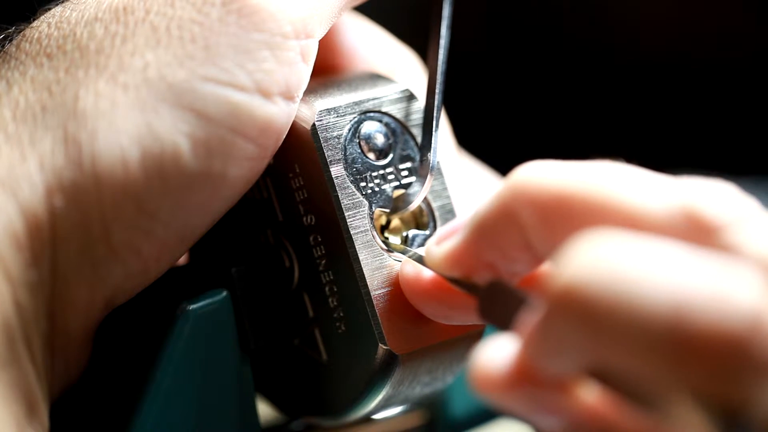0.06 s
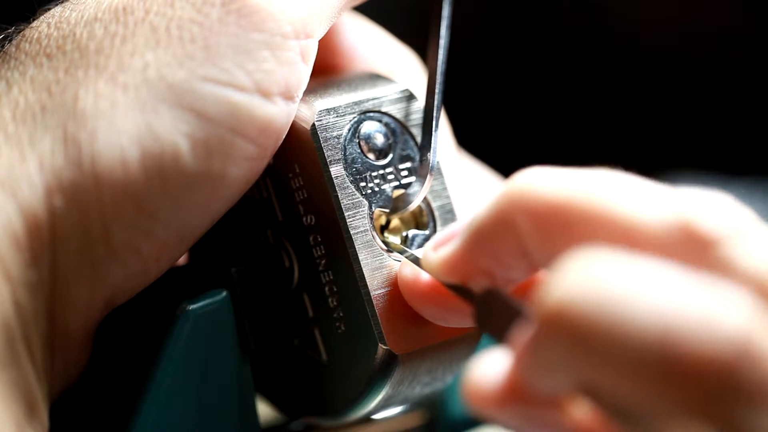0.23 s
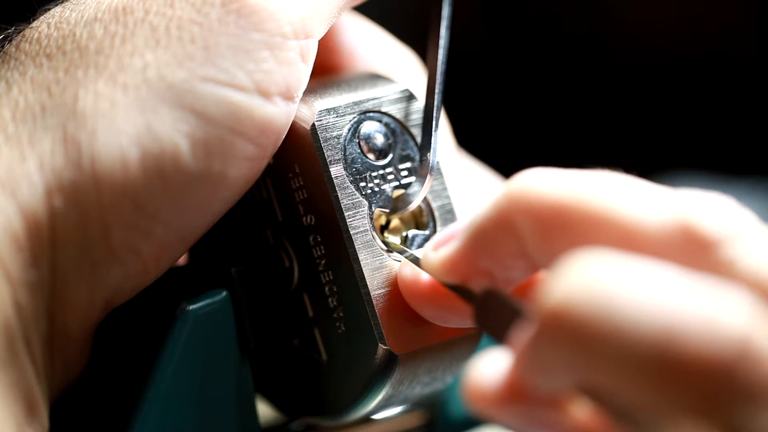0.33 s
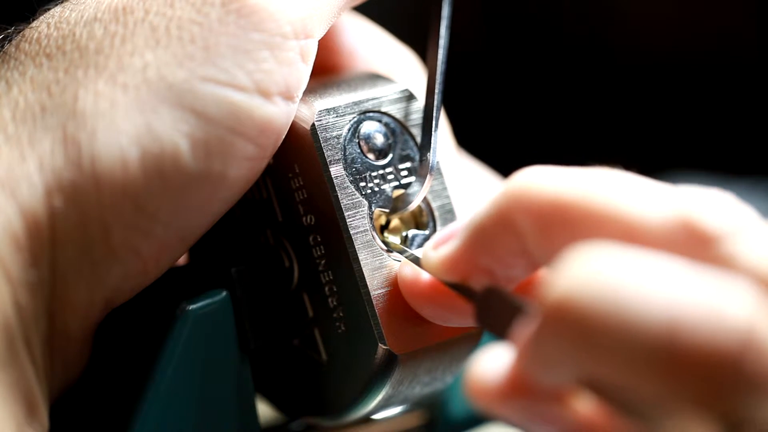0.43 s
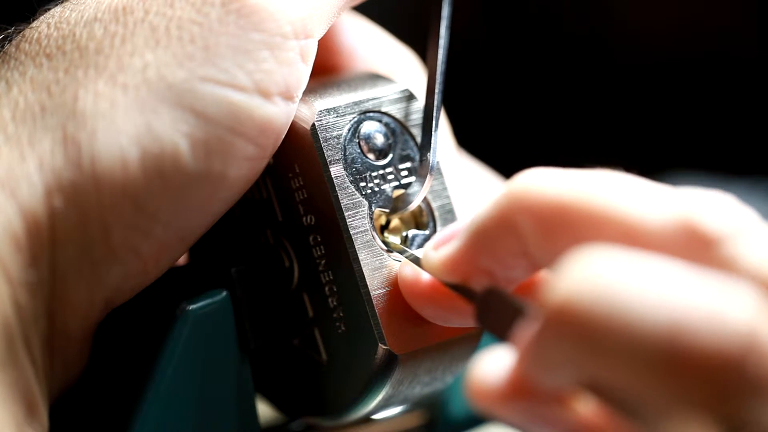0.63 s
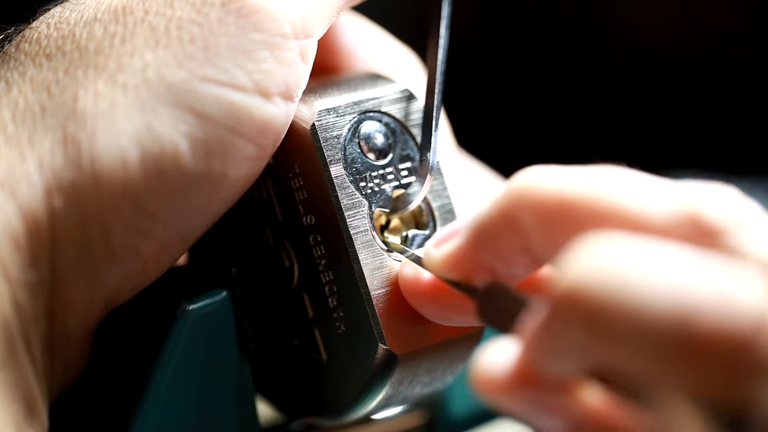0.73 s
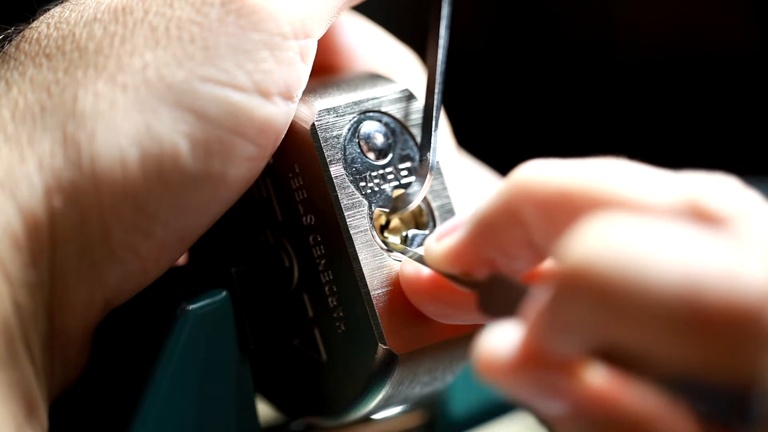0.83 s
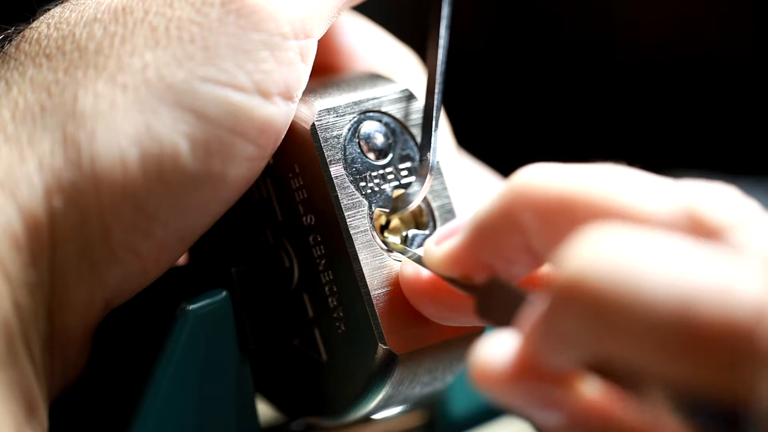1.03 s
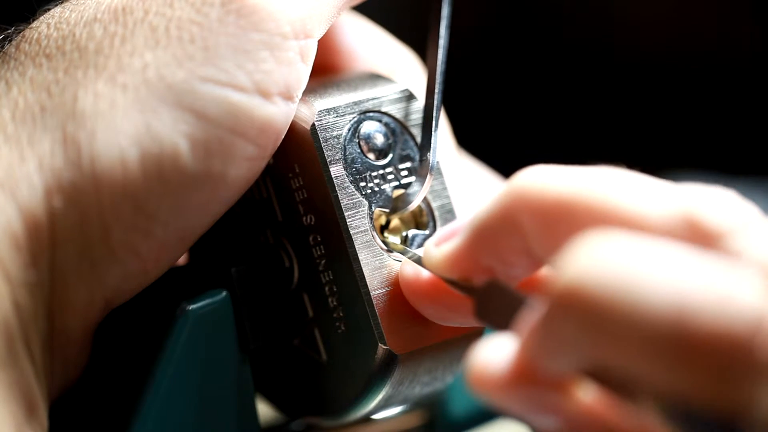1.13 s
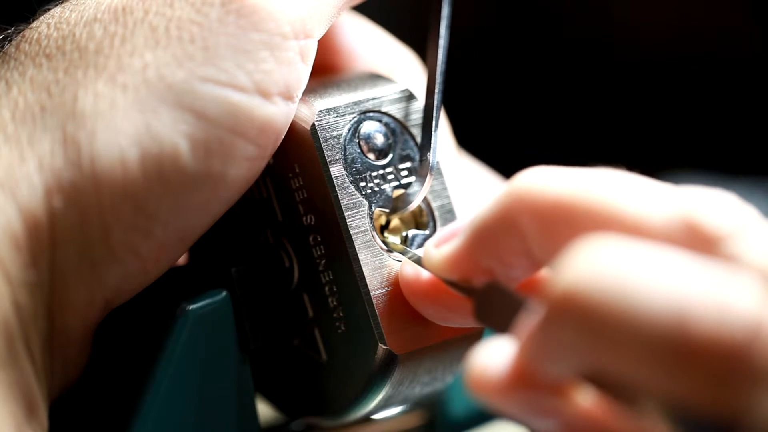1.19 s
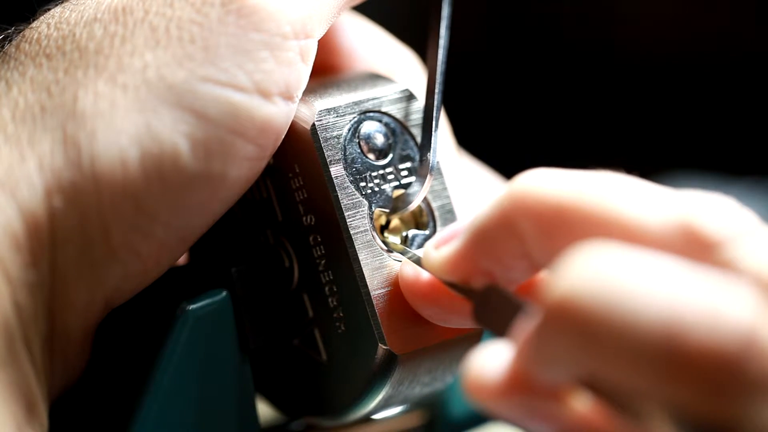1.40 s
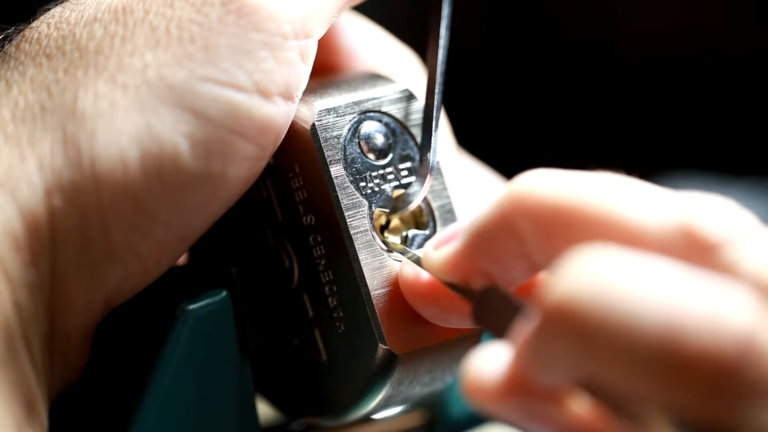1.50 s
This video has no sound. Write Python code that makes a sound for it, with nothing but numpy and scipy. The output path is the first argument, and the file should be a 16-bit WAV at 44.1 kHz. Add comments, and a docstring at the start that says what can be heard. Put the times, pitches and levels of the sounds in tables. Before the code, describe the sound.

Close up in a quiet small room, a faint tick, then one crisp padlock click with a soft thud of vice and bench, then almost nothing but low rumble, hiss and very faint metal rubbing.

```python
"""At a bench in a room, a pick slips off a pin inside a padlock held in a vice. One bright snap is a sum of
decaying lock modes with a filtered contact click and echoes; dull knocks ring the modes of vice and bench.
Three faint ticks ring a small metal body, with gritty noise; noise through resonators rubs it all the time.
Noise bands make a short room tail; sine partials of mains hum and shaped noise, as room rumble and
microphone hiss, lie below."""
import sys
import numpy as np
from scipy import signal
from scipy.fft import rfft, irfft
from scipy.io import wavfile

SR = 44100
rng = np.random.default_rng(int(sys.argv[2]) if len(sys.argv) > 2 else 0)


def digitize_waveform(pressure):
    """Quantize a signal to 16-bit integers and store it at the path in sys.argv[1].

    Rows of a 2-D input are taken as channels; values are limited to [-1, 1].
    """
    field = np.atleast_2d(pressure).T
    bounded = np.clip(field, -1, 1)
    quanta = np.round(bounded * 32767).astype(np.int16)
    wavfile.write(sys.argv[1], SR, quanta)


def gain_from_db(level_db):
    """Convert decibel levels to linear amplitude factors (20 dB per decade)."""
    decades = np.asarray(level_db, float) / 20
    return 10 ** decades


N = 68355  # samples


def rms_one(x):
    """Normalization: the signal is divided by its root mean square."""
    return x / np.sqrt(np.mean(x ** 2) + 1e-20)


def at_hz(table, hz):
    """Logarithmic frequency scale: table columns are interpolated against log frequency."""
    table_hz, *columns = np.transpose(table)
    log_hz = np.log(np.maximum(hz, 1))
    return [np.interp(log_hz, np.log(table_hz), column) for column in columns]


def band(x, low_hz, high_hz):
    """Band-pass filtering: gentle Butterworth slopes pass one frequency range."""
    sos = signal.butter(2, [low_hz, high_hz], "band", fs=SR, output="sos")
    return signal.sosfilt(sos, x + 1e-18)


# modes of the small metal body:
# (frequency [Hz], level under a tick [dB], decay by 60 dB [s], rms level when rubbed [dB])
BODY_MODES = [(458, -21, 0.045, -82.5), (625.7, -20.5, 0.016, -77), (1168, -17.5, 0.1, -76.5),
              (1240, -15, 0.067, -78), (1440, -19, 0.054, -91), (1904, -1.5, 0.031, -75.5),
              (2260, -7, 0.032, -79), (2700.5, 3.5, 0.02, -72), (3650, -16, .025, -94),
              (5230, -19, 0.025, -92.5), (8120, -13, .014, -88.5), (8745, -19, 0.011, -99.5)]
# pressure of the rubbing; only departures from the mean level count: (time [s], level [dB])
RUB_PRESSURE = [(0.0, -70.5), (1.312, -69.5), (1.416, -71.5), (1.55, -69)]
GRIP_FLICKER_DB, GRIP_FLICKER_HZ = 1.5, 26  # rms depth, pole frequency of the smoothing


def rubbing():
    """Friction excitation: noise with an uneven grip keeps the modes of the body murmuring."""
    time_s, pressure_db = np.transpose(RUB_PRESSURE)
    pole = np.exp(-2 * np.pi * GRIP_FLICKER_HZ / SR)
    smoothed = signal.lfilter([1], [1, -2 * pole, pole * pole], rng.standard_normal(N + SR))
    grip = rms_one(smoothed[SR:])  # the filter has settled
    slow_db = np.interp(np.arange(N) / SR, time_s, pressure_db - pressure_db.mean())
    gain = gain_from_db(slow_db + GRIP_FLICKER_DB * grip)
    murmur = np.zeros(N)
    for hz, _, t60, rub_db in BODY_MODES:
        radius = gain_from_db(-60 / (t60 * SR))
        poles = [1, -2 * radius * np.cos(2 * np.pi * hz / SR), radius * radius]
        once = signal.lfilter([1, 0, -1], poles, rng.standard_normal(N + 4000))
        twice = signal.lfilter([1, 0, -1], poles, once)
        murmur += gain_from_db(rub_db) * rms_one(twice[4000:])
    return gain * murmur


# spectral shape of room rumble and microphone hiss: (frequency [Hz], relative density [dB per Hz])
NOISE_SHAPE = [(25, 0), (45, 0), (70, -1), (110, -3), (200, -9), (500, -5), (800, -9), (1100, -13.5),
               (2200, -11.5), (3200, -16.5), (8000, -18.5), (16000, -20)]
NOISE_DB = -65.5  # rms


def rumble_and_hiss():
    """Spectral shaping: the spectrum of white noise is weighted to that of room and microphone."""
    shape_db, = at_hz(NOISE_SHAPE, np.fft.rfftfreq(N, 1 / SR))
    white = rng.standard_normal(N)
    return gain_from_db(NOISE_DB) * rms_one(irfft(rfft(white) * gain_from_db(shape_db), N))


# partials of the mains hum: (frequency [Hz], rms level [dB])
HUM_PARTIALS = [(120, -75), (240, -82), (360, -83.5)]


def mains_hum():
    """Superposition of harmonics: steady sine partials start at random phases."""
    t = np.arange(N) / SR
    hum = np.zeros(N)
    for hz, db in HUM_PARTIALS:
        hum += np.sqrt(2) * gain_from_db(db) * np.sin(2 * np.pi * (hz * t + rng.random()))
    return hum


def strike(events, modes, rise_cycles, spread_db):
    """Modal superposition: each blow excites every mode, which swells over its cycles, then dies."""
    out = np.zeros(N)
    for s, db in events:
        start = int(s * SR) + 1
        t = np.arange(start, min(N, start + SR // 4)) / SR - s
        for k, (hz, mode_db, t60, *_) in enumerate(modes):
            swell = (1 - np.exp(-t * hz / rise_cycles)) ** 2
            decay = gain_from_db(-60 * t / t60)
            level = gain_from_db(db + mode_db + spread_db * rng.standard_normal())
            sign = (-1) ** k  # neighbouring modes start in opposite directions
            out[start:start + len(t)] += sign * level * swell * decay * np.sin(2 * np.pi * hz * t)
    return out


# faint ticks: (time [s], level [dB])
TICK_EVENTS = [(0.1215, -37.5), (0.2708, -38), (1.4290, -38.5)]


def tick_ringing():
    """Impact excitation: each tick sets the modes of the small metal body ringing."""
    return strike(TICK_EVENTS, BODY_MODES, rise_cycles=4.5, spread_db=1.0)


CRACK_DB, CRACK_T60_S = -13, 0.025  # noise level re each tick, before filtering; decay by 60 dB


def tick_crack():
    """Exponential decay: a gritty burst of band noise dies away from each tick."""
    t = np.arange(N) / SR
    envelope = np.zeros(N)
    for s, db in TICK_EVENTS:
        fall_db = 60 * np.maximum(t - s, 0) / CRACK_T60_S
        envelope += (t >= s) * gain_from_db(db + CRACK_DB - fall_db)
    return band(envelope * rng.standard_normal(N), 2580, 11000)


# response of the room: (frequency [Hz], relative level [dB], decay by 60 dB [s])
ROOM_RESPONSE = [(150, -10.5, .25), (398.6, -13.5, 0.42), (1200, -4.5, .3), (3000, -9, 0.24),
                 (5575, -3, 0.33), (8230, -13.5, .33), (11000, -12.5, 0.29), (15070, -15, .14)]
ROOM_ONSET_S, ROOM_BUILD_S = 0.002, 0.0011  # silence first, then the time constant of the build-up


def room(x):
    """Reverberation: dense reflections are half-octave noise bands, each dying at its own rate."""
    t = np.arange(SR // 2) / SR
    edges_hz = 70 * 2 ** np.arange(0, 8.1, .5)
    white = rng.standard_normal((2, len(t)))
    response = np.zeros(len(t))
    for k, (low, high) in enumerate(zip(edges_hz, edges_hz[1:])):
        db, t60 = at_hz(ROOM_RESPONSE, np.sqrt(low * high))
        energy_scale = np.sqrt(t60 * SR / (6 * np.log(10)))  # evens out long and short decays
        decay = gain_from_db(-60 * t / t60) / energy_scale
        response += gain_from_db(db) * decay * band(white[k % 2], low, high)  # neighbours use different noise
    response *= 1 - np.exp(-np.maximum(t - ROOM_ONSET_S, 0) / ROOM_BUILD_S)
    return signal.fftconvolve(x, response)[:N]


SNAP_S, SNAP_DB = .2081, -6
# modes of the lock: (frequency [Hz], level under the snap [dB], decay by 60 dB [s])
LOCK_MODES = [(1734, -25.5, 0.0074), (2500, -8, 0.0038), (4080, -16.5, .006), (5900, -23, 0.008),
              (6630, -17.5, 0.0068), (7330, -8, 0.0087), (7740, 6.5, 0.002), (8526, -0.05, 0.0048),
              (9270, -11, .0053), (10200, -21.5, 0.0066), (10700, -19.5, .006), (12350, -19, 0.00408),
              (13700, -22, .005), (15400, -19.5, 0.0037)]


def snap_ringing():
    """Impact excitation: the slipping pick sets the modes of the lock ringing."""
    return strike([(SNAP_S, SNAP_DB)], LOCK_MODES, rise_cycles=1.6, spread_db=3.2)


CONTACT_DB = -17  # peak of the impulse, before filtering


def snap_contact():
    """Impulse response: the bare steel-on-brass contact is one band-passed impulse."""
    impulse = np.arange(N) == int(SNAP_S * SR) + 8
    return gain_from_db(CONTACT_DB) * band(impulse, 700, 12500)


# knocks through vice and bench: (time [s], level [dB])
KNOCK_EVENTS = [(.2086, -36.5), (.2166, -35), (.2280, -54), (.2530, -54), (.2700, -53.5), (.2830, -55)]
# modes of vice and bench: (frequency [Hz], level under a knock [dB], decay by 60 dB [s])
BENCH_MODES = [(110, -11, 0.033), (180, -12.5, 0.056), (265.6, -9, 0.031), (377, -4, .06),
               (495, -11.5, 0.049), (668, -15, .05), (816, -15.5, .04), (1350, -20, 0.0253)]


def bench_knocks():
    """Structure-borne sound: each knock rings the low modes of vice and bench."""
    return strike(KNOCK_EVENTS, BENCH_MODES, rise_cycles=.3, spread_db=5.5)


# reflections of the snap off vice, hand and bench: (delay [s], level [dB])
NEAR_ECHOES = [(.0019, -18.5), (.0036, -21.5), (.0078, -26)]


def near_echoes(x):
    """Specular reflection: nearby surfaces return delayed, weaker copies."""
    return sum(gain_from_db(db) * np.roll(x, int(s * SR)) for s, db in NEAR_ECHOES)


# sent to the room; the contact spreads all round, so the room gets more of it
CONTACT_ROOM_DB, KNOCK_ROOM_DB, TICK_ROOM_DB = 11.5, 1.5, -8.5


def scene():
    """Linear superposition: snap, knocks and ticks with their room, over rubbing and background."""
    snap, contact = snap_ringing(), snap_contact()
    knocks = bench_knocks()
    ticks = tick_ringing() + tick_crack()
    direct = snap + contact + near_echoes(snap + contact) + knocks + ticks
    # the contact takes other paths through the room than the ringing
    contact_tail = room(gain_from_db(CONTACT_ROOM_DB) * contact)
    ringing_tail = room(snap + gain_from_db(KNOCK_ROOM_DB) * knocks + gain_from_db(TICK_ROOM_DB) * ticks)
    steady = rubbing() + rumble_and_hiss() + mains_hum()
    return (direct + contact_tail + ringing_tail + steady)[None]


def roll_off(x):
    """The treble ends steeply here."""
    return signal.sosfilt(signal.butter(12, 17280, fs=SR, output="sos"), x)


def record(dry):
    """Low-pass filtering: a steep zero-phase filter cuts the top of the spectrum."""
    # stop band from 15900 Hz, 25 dB down in each of two passes
    low_pass = signal.cheby2(10, 25, 15900, fs=SR, output="sos")
    mix = signal.sosfiltfilt(low_pass, dry)
    return roll_off(mix)


dry = scene()
out = record(dry)
digitize_waveform(out)
```